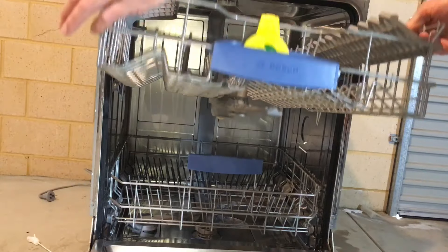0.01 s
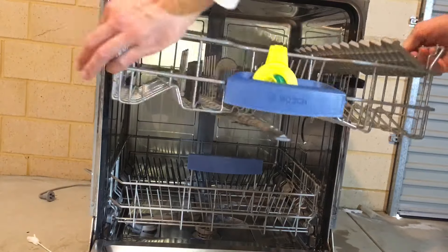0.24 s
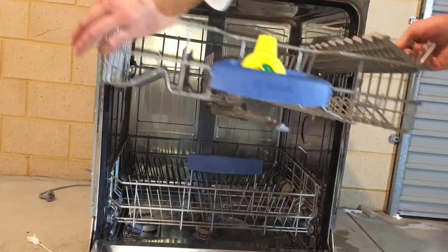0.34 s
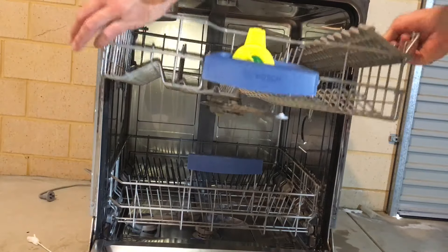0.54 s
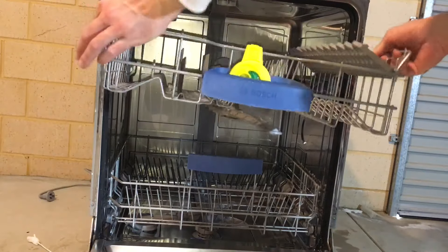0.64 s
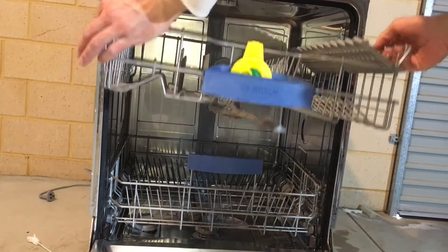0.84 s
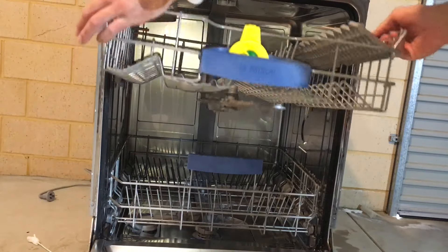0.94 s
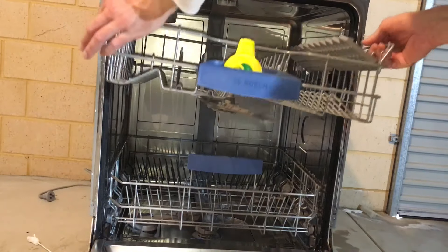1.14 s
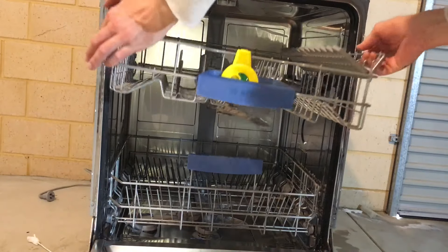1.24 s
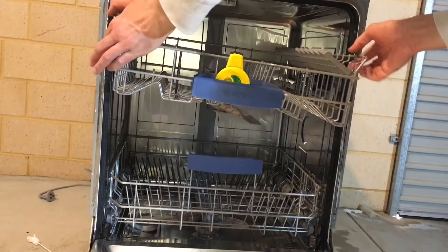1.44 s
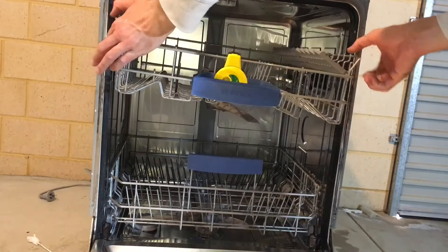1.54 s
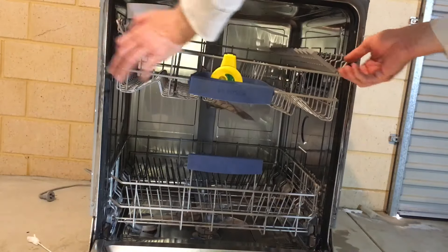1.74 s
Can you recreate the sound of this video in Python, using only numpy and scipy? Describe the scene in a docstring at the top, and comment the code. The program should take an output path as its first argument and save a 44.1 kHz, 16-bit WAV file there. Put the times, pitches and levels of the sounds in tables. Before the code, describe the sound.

A metal wire rack clacks onto dishwasher rails. After near silence and faint ticks, a bright, rattling cluster hits at 0.25-0.35 s with a hollow low tub boom and brief rolling rumble. A second tight clatter lands at 0.63-0.73 s. Small clicks and soft thuds follow, with light knocks near 1.26-1.33 s, fading to barely audible ticks by 1.75 s. Close, hard-walled room, short metallic ring, faint steady background.

```python
"""In a hard-walled room, a wire rack is pushed into an open dishwasher.
It clatters onto its rails twice, rolls in with small clicks and knocks against the stop.
Knocks and grit are shaped noise, and they excite the decaying modes of the wires.
The steel tub booms: heavy blows excite low panel modes, and the wheels give a noise rumble.
The tub and the room prolong each knock; a faint steady noise lies beneath."""
import sys
import numpy as np
from scipy import signal
from scipy.fft import rfft, irfft
from scipy.io import wavfile

SR = 44100
rng = np.random.default_rng(int(sys.argv[2]) if len(sys.argv) > 2 else 0)


def put_to_file(sound):
    """Save the sound as 16-bit audio at rate SR, in the file named by the first command-line argument."""
    columns = np.atleast_2d(sound).T  # one column per channel
    safe = np.clip(columns, -1, 1)
    whole_steps = np.round(safe * 32767)
    wavfile.write(sys.argv[1], SR, whole_steps.astype(np.int16))


N = 79380  # 1.8 s

# Knocks of the rack on its rails:
# t/s, level/dB, low-mid body/dB, treble/dB, decay time constant/s, f of the struck wire/Hz
KNOCKS = [(0.099, -47, 7.5, 0.5, 0.0077, 6200), (0.153, -47.5, 1, -7, .008, 5800),
          (0.165, -41.5, 6, -4, 0.012, 3670), (0.193, -43.5, 11, -21, 0.0114, 2750),
          (.247, -35.5, -3.5, -15, 0.036, 2400), (.261, -22, 3, 1, 0.022, 3700),
          (.266, -28.5, 2, 5, 0.018, 5450), (.279, -23.5, 1, 0, 0.019, 4230),
          (0.292, -19, -20, -7, 0.0047, 1960), (0.309, -25.5, 13.5, 8, 0.0084, 3120),
          (.310, -39.5, -17, 4, .01, 8700), (.321, -35, -2, 8.5, 0.0066, 8650),
          (0.35, -33, 3.5, -3, 0.0072, 3000), (0.622, -45.5, -6, -2, .02, 2760),
          (0.633, -36, 13.5, 0, 0.024, 3220), (.644, -17, -7, 4.5, 0.0096, 5030),
          (.650, -18, -3, 2, 0.017, 3350), (.655, -18, -6, 2, 0.0091, 6735),
          (.664, -20.5, 2.5, -2, 0.0092, 6430), (0.675, -20, -2.5, -2, 0.014, 3960),
          (0.699, -27.5, 7, -3, 0.016, 1700), (.724, -27.5, 10.5, -7, 0.013, 3430),
          (.822, -37.5, -2.5, -21, 0.032, 3900), (0.925, -36.5, 4.5, -22, 0.017, 2280),
          (0.933, -40, -1, 6, 0.014, 5370), (.967, -42, 6, -15, 0.016, 1390),
          (1.069, -39.5, -10, -10.5, 0.012, 2750), (1.075, -42, 5, 2, 0.0095, 5160),
          (1.256, -34, -1, -15, 0.0097, 2670), (1.263, -36, -0.5, -1, .005, 4700),
          (1.298, -32, -11, -4, 0.0055, 2720), (1.306, -33.5, -3, -8, .008, 3210),
          (1.319, -36.5, 1.5, -7, 0.016, 6650), (1.619, -42.5, 5, -6, 0.0086, 2710),
          (1.654, -53, 8.5, -2, 0.025, 2780), (1.718, -55, -20, -22, 0.012, 2850),
          (1.747, -59, -11, -38, 0.0078, 2660)]
# Relative spectral density of a knock: f/Hz, level/dB
KNOCK_SPECTRUM = [(150, 8), (400, -4.5), (800, -4.5), (1200, -4), (1700, -2.5), (2300, -1.5), (3100, 0.5),
                  (4300, -4), (6200, -2), (7600, -6.5), (10000, -10), (12500, -17.5), (16000, -26)]
# Resonances of the rack that colour every knock and the rolling: f/Hz, half-width/Hz, level/dB
RACK_RESONANCES = [(2774, 210, -1), (4840, 600, 0), (5370, 120, 1.5), (7400, 300, -2.5), (8720, 45, 10.5),
                   (10150, 180, 3), (12830, 170, 2.5)]
KNOCK_RISE_S, KNOCK_GRAIN_DB = 0.0045, 3.5
STRUCK_WIRE_DB, STRUCK_WIRE_HALF_WIDTH_HZ = 8.5, 246  # how far the struck wire stands out
CAVITY_DB, CAVITY_T60_S, ROOM_DB = -4, 0.12, -13.5  # echoes relative to the direct knock


def knocks():
    """Impact and reverberation: bursts of tiny contacts, with echoes from the tub and the room."""
    direct, echoes = np.zeros(N), np.zeros(N)
    t = np.arange(2 ** 15) / SR
    rise = np.minimum(t / KNOCK_RISE_S, 1)
    cavity = rise * amp(CAVITY_DB - 60 * t / CAVITY_T60_S)
    for start, db, body_db, treble_db, decay, wire_hz in KNOCKS:
        struck_wire = (wire_hz, STRUCK_WIRE_HALF_WIDTH_HZ, STRUCK_WIRE_DB)
        resonances = RACK_RESONANCES + [struck_wire]
        # Three independent noises: direct sound, tub echo and room echo
        bursts = grains(len(t), KNOCK_SPECTRUM, KNOCK_GRAIN_DB, body_db, treble_db, resonances, count=3)
        chatter, early, late = amp(db) * scattered(bursts)
        fall = np.exp(-np.maximum(t - KNOCK_RISE_S, 0) / decay)
        add(direct, start, chatter * rise * fall)
        add(echoes, start, early * cavity + amp(ROOM_DB) * room(late))
    return direct, echoes


# Ringing modes of the wires: f/Hz, relative level/dB, t60/s
WIRE_MODES = [(575, 4.5, 0.5), (692, 5.5, 0.44), (1583, 3.5, 0.4), (2420, -8, 0.78), (2708, 4, .35),
              (2830, 3.5, 0.41), (3476.5, -4.5, 0.19), (3280, -5.5, 0.46), (3970, -15.5, 1),
              (4079, 5.5, 0.22), (5150, 4.5, 0.2), (5990, 5, 0.19)]
WIRES_DB = -14.5


def wires(excitation):
    """Modal resonance: contact forces set the wires ringing, by convolution with their response."""
    return amp(WIRES_DB) * through(excitation, ringing(WIRE_MODES))


# Blows that reach the tub: t/s, relative level/dB, reference t60/s, extra level of upper modes/dB
THUMPS = [(0.03, -44, 0.067, -14), (0.112, -33.5, 0.43, 1.5), (.188, -23, 0.17, -2),
          (0.263, -21.5, 0.39, 0), (.284, -12.5, 0.21, -2), (.368, -26, 0.23, 4),
          (.408, -23.5, 0.27, -11.5), (.590, -28, 0.12, -24), (.667, -15, 0.25, 4), (0.699, -31, 0.4, 6.5),
          (.838, -22, 0.12, 2.5), (0.937, -26.5, 0.14, -1), (0.975, -21, 0.072, -13),
          (1.036, -38, .15, -15), (1.097, -29, 0.12, 0), (1.276, -34.5, 0.18, 0), (1.295, -32.5, 0.17, -4),
          (1.332, -36, 0.18, 11.5), (1.422, -34, 0.11, 8), (1.507, -35, 0.26, -4), (1.647, -44, 0.49, -0.5),
          (1.760, -47.5, 0.1, 0.5)]
# Modes of the tub panels: f/Hz, relative level/dB, ring time as a multiple of the blow's t60
TUB_MODES = [(51.3, -39, 1.9), (74.3, -10.5, 2.15), (110.8, -1.5, 0.93), (131.8, 4, 0.73), (152, -23, 1.8),
             (194.1, -13.5, 0.96), (219.1, -11, 0.35), (314.1, -9, 0.76), (342.1, -14.5, 0.61),
             (384.5, -22.5, 0.97), (418, -16, 0.58)]
THUMP_DB, PUSH_S = -1, 0.01  # gain of all blows; time constant of the swell
UPPER_HZ = (170, 300)  # the extra level fades in over this range


def tub():
    """Panel vibration: each blow swells into low modes, and its hardness sets the upper ones."""
    out = np.zeros(N)
    swell = 1 - np.exp(-np.arange(SR) / SR / PUSH_S)
    for start, db, t60, upper_db in THUMPS:
        modes = []
        for hz, level, ring_share in TUB_MODES:
            extra_db = np.interp(hz, UPPER_HZ, [0, upper_db])
            modes.append((hz, level + extra_db, t60 * ring_share))
        add(out, start, amp(db + THUMP_DB) * swell * ringing(modes))
    return out


# Rolling on the rails: t/s, rumble level/dB, grit level before unevenness/dB
ROLL = [(0, -55, -81), (.09, -59, -81), (.2, -45, -61), (.3, -20.5, -39.5), (.43, -36, -52),
        (.56, -45.5, -59.5), (0.641, -38.5, -52.5), (.70, -27.5, -70), (.8, -35, -55),
        (1.001, -46.5, -53.5), (1.2, -44, -56), (1.35, -46, -50.5), (1.55, -52, -59), (1.8, -53, -62.5)]
# Relative spectral density of the rumble: f/Hz, level/dB
RUMBLE_SPECTRUM = [(20, -44), (32, -41), (45, 15), (75, -14), (92, 1.5), (110, 7.5), (132, 3.5),
                   (165, -12.5), (205, -3), (255, -28.5), (315, -7), (450, -28), (700, -25.5), (1500, -65)]
# Relative spectral density of the grit: f/Hz, level/dB
GRIT_SPECTRUM = [(200, 3), (600, -7), (1050, -9.5), (1600, -8.5), (2800, -7), (4500, -12.5), (6700, -16.5),
                 (7800, -20), (9300, -21), (10500, -14), (12000, -26.5), (16000, -34)]
GRIT_GRAIN_DB = -1
UNEVEN_DB, UNEVEN_STEP_S = 3, 0.025  # the grip of the wheels comes and goes


def wheels():
    """Rolling contact: a low rumble in the tub and a fine, unsteady grit from the rails."""
    roll_t, rumble_db, grit_db = np.transpose(ROLL)
    t = np.arange(N) / SR
    steps = np.arange(0, N / SR + 0.1, UNEVEN_STEP_S)
    uneven_db = UNEVEN_DB * np.interp(t, steps, rng.standard_normal(len(steps)))
    rumble_noise = grains(N, RUMBLE_SPECTRUM)[0]
    rumble = amp(np.interp(t, roll_t, rumble_db)) * rumble_noise
    grit_noise = grains(N, GRIT_SPECTRUM, GRIT_GRAIN_DB, resonances=RACK_RESONANCES)[0]
    grit = amp(np.interp(t, roll_t, grit_db) + uneven_db) * grit_noise
    return rumble, grit


# Reverberation of the room: f/Hz, t60/s
ROOM_T60 = [(100, 1), (500, 0.76), (1500, 0.94), (3000, 0.64), (6000, 0.55), (10000, 0.49), (16000, 0.28)]
ROOM_BUILD_UP_S = 0.004  # time constant


def room(x):
    """Diffuse-field decay: the sound builds up, then each band dies away at its own rate."""
    hz, t, bands = signal.stft(x, SR, nperseg=256)
    decay = amp(-60 * t / read(ROOM_T60, hz)[:, None])
    tail = signal.istft(bands * decay, SR, nperseg=256)[1][:len(x)]
    return tail * (1 - np.exp(-np.arange(len(x)) / SR / ROOM_BUILD_UP_S))


# Relative spectral density of the background: f/Hz, level/dB
FLOOR_SPECTRUM = [(20, -39), (120, 7), (500, -27.5), (1500, -21.5), (4000, -32.5), (10000, -35),
                  (16000, -42)]
FLOOR_DB = -59


def floor():
    """Stationary noise: a faint, steady coloured background."""
    return amp(FLOOR_DB) * grains(N, FLOOR_SPECTRUM)


BODY_HZ, TREBLE_HZ = (1000, 2600), (4500, 9000)  # transition ranges of the low and high shelves


def grains(size, spectrum, grain_db=0, body_db=0, treble_db=0, resonances=(), count=1):
    """Spectral shaping: rows of uneven noise take a spectrum, two shelves and resonances."""
    unevenness = np.minimum(rng.exponential(1, (count, size)), 5)
    noise = rng.standard_normal((count, size)) * amp(grain_db * unevenness)
    hz = np.fft.rfftfreq(size, 1 / SR)
    db = read(spectrum, hz)
    db = db + np.interp(hz, BODY_HZ, [body_db, 0])
    db = db + np.interp(hz, TREBLE_HZ, [0, treble_db])
    for centre, half_width, lift in resonances:
        db = db + lift / (1 + ((hz - centre) / half_width) ** 2)
    return unit(irfft(rfft(noise) * amp(db), size))


SCATTER_DB, SCATTER_HZ = 3, 109.04  # spread of the random gains; spacing of the bands


def scattered(x, count=400):
    """Modal overlap: each knock stirs a random mix of many close wire modes, as random band gains."""
    hz = np.fft.rfftfreq(x.shape[-1], 1 / SR)
    band_hz = SCATTER_HZ * np.arange(count)
    db = SCATTER_DB * np.interp(hz, band_hz, rng.standard_normal(count))
    return unit(irfft(rfft(x) * amp(db), x.shape[-1]))


def ringing(modes):
    """Modal superposition: one second of exponentially decaying sines."""
    t = np.arange(SR) / SR
    return sum(amp(db - 60 * t / t60) * np.sin(2 * np.pi * hz * t) for hz, db, t60 in modes)


def through(x, response):
    """Linear filtering: convolution with a response scaled to unit energy."""
    return signal.fftconvolve(x, response / np.linalg.norm(response))[:N]


def read(points, hz):
    """Logarithmic frequency scale: interpolates a table along it."""
    f, value = np.transpose(points)
    return np.interp(np.log(hz + 1), np.log(f + 1), value)


def amp(db):
    """Decibel law: level to amplitude ratio."""
    return 10 ** (np.asarray(db) / 20)


def unit(x):
    """Root-mean-square normalization: one common factor for all rows."""
    return x / np.sqrt(np.mean(x ** 2) + 1e-20)


def add(mix, start, sound):
    """Superposition: adds a sound to the mix from its start time in seconds."""
    part = mix[max(round(start * SR), 0):][:len(sound)]
    part += sound[:len(part)]


def scene():
    """Superposition of the knocks, wires, tub, wheels and background."""
    hits, echoes = knocks()
    rumble, grit = wheels()
    rack = hits + wires(hits + grit) + echoes + tub() + rumble + grit
    return rack[None] + floor()


LOW_CUT_HZ, EDGE_HZ = 76, 15950


def record(dry):
    """Band limitation: the microphone sheds the deepest bass, then a low-pass removes the top."""
    high_pass = signal.butter(3, LOW_CUT_HZ, "high", fs=SR, output="sos")
    thin = signal.sosfilt(high_pass, dry)
    low_pass = signal.firwin(511, EDGE_HZ, window=("kaiser", 9), fs=SR)
    return signal.oaconvolve(thin, low_pass[None], "same")


dry = scene()
out = record(dry)
put_to_file(out)
```